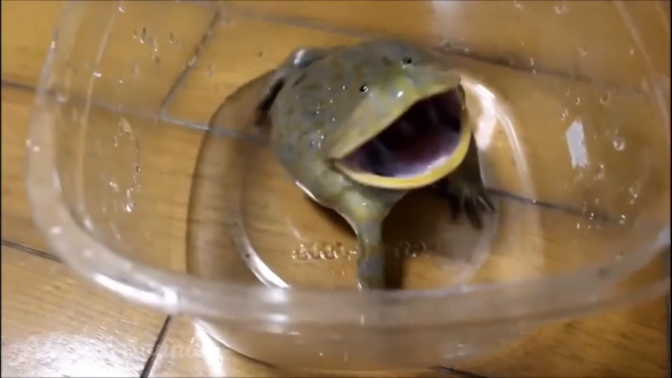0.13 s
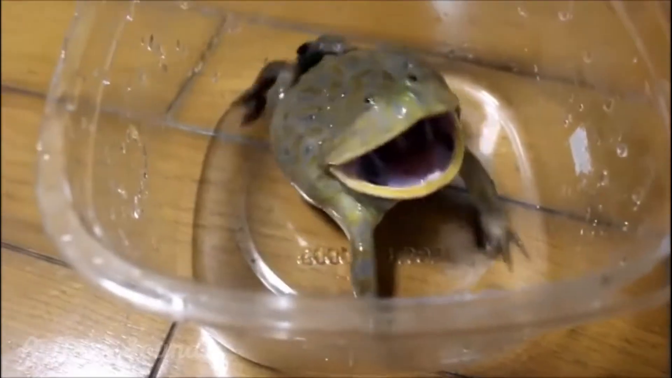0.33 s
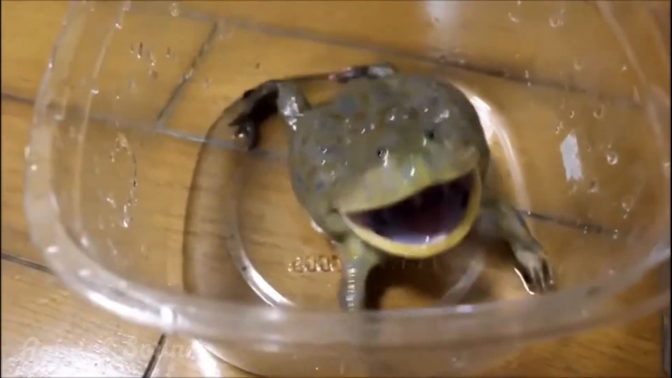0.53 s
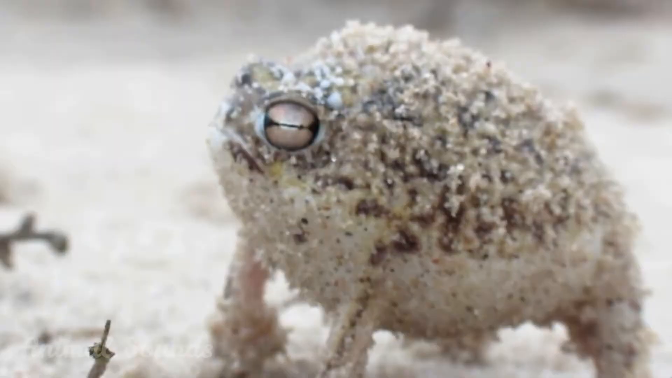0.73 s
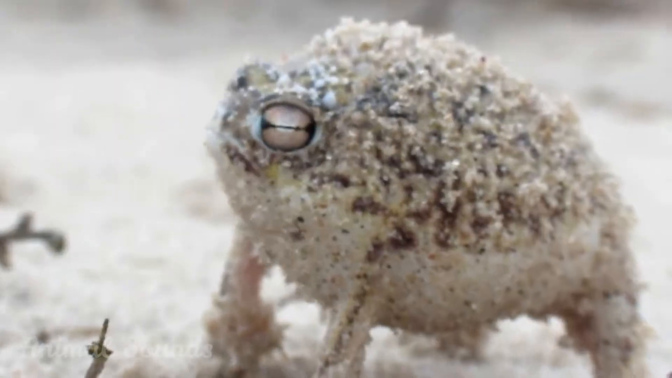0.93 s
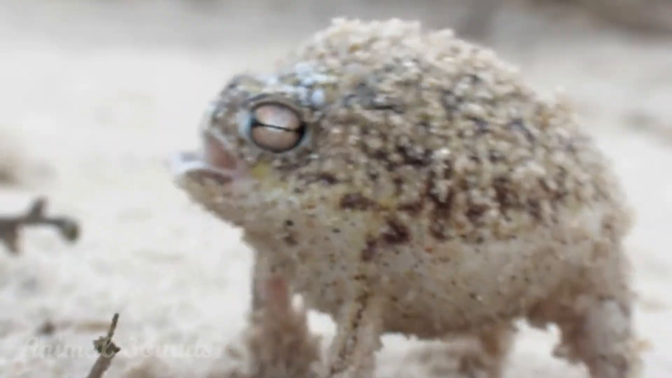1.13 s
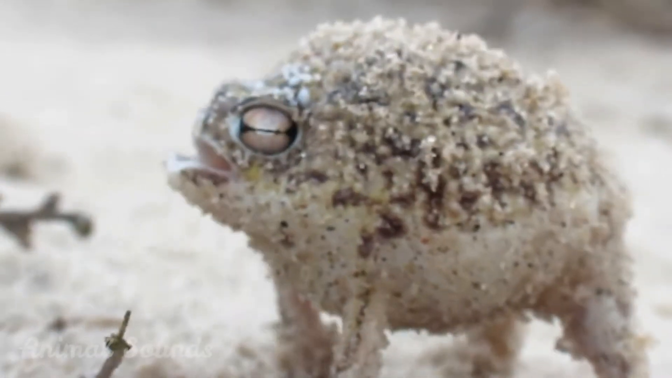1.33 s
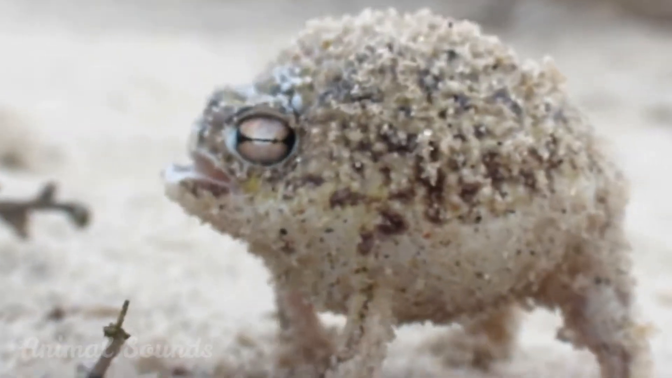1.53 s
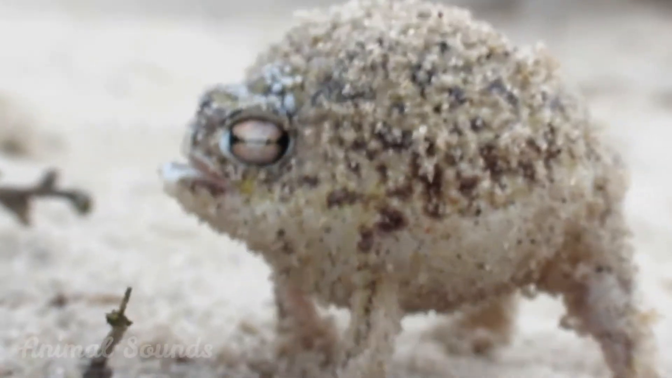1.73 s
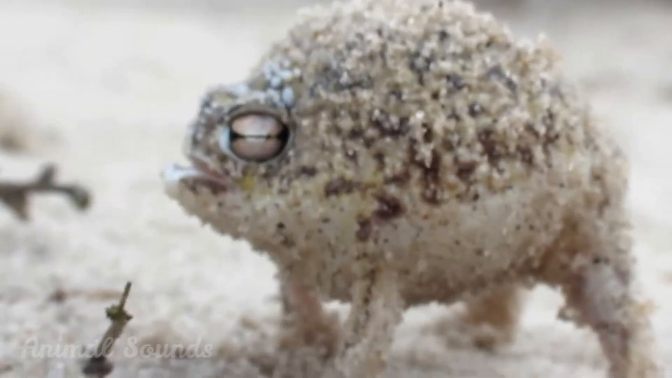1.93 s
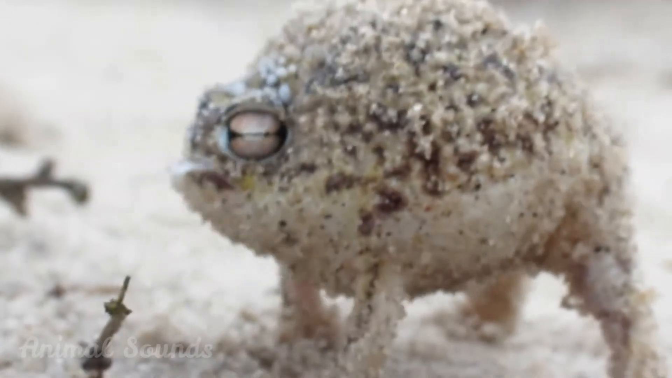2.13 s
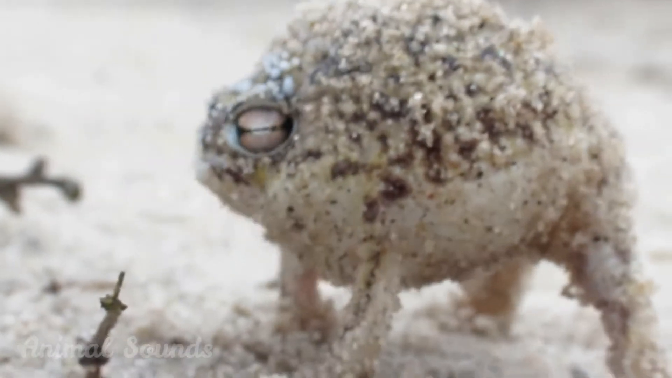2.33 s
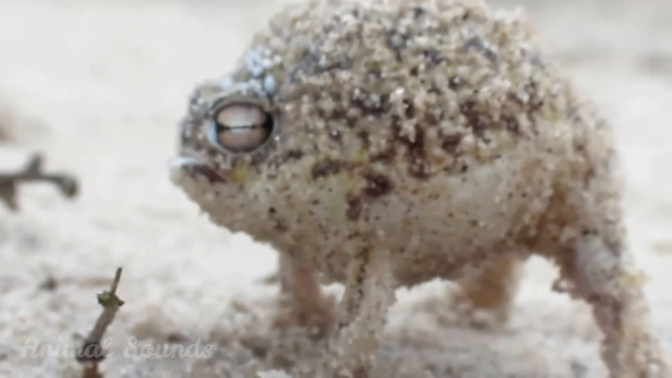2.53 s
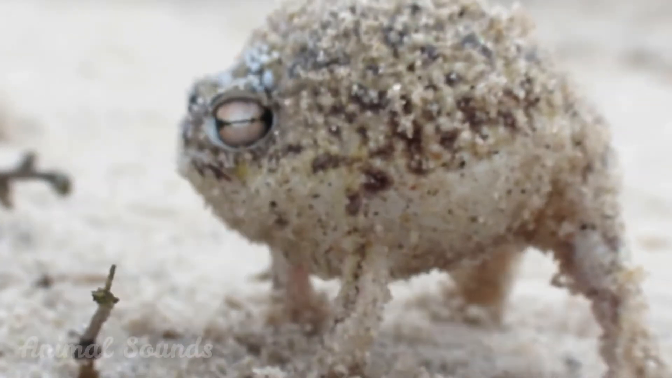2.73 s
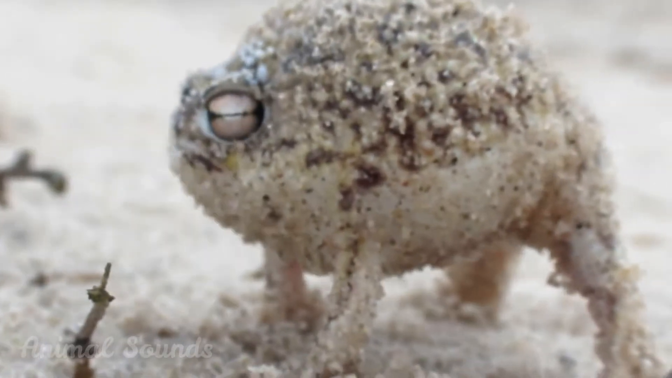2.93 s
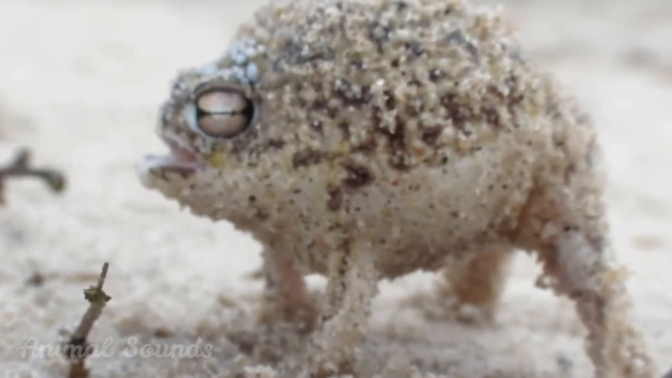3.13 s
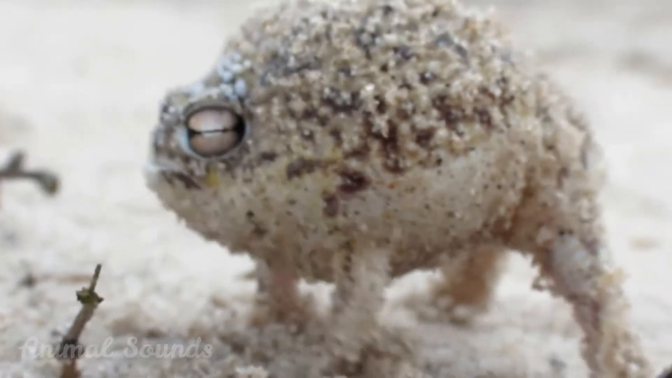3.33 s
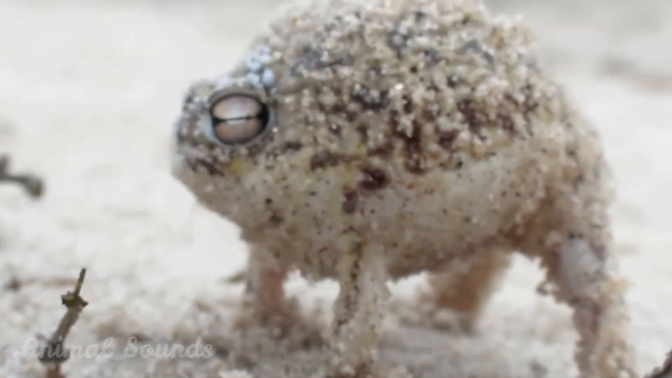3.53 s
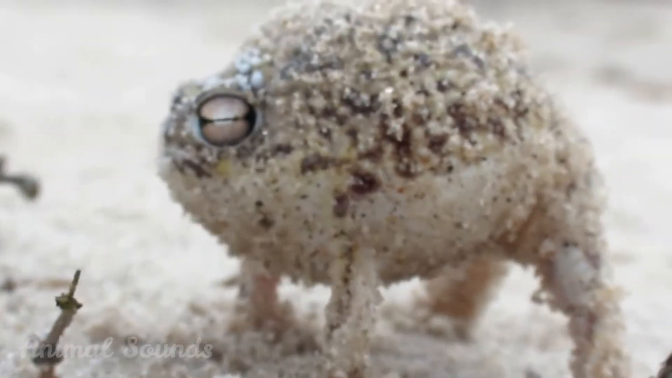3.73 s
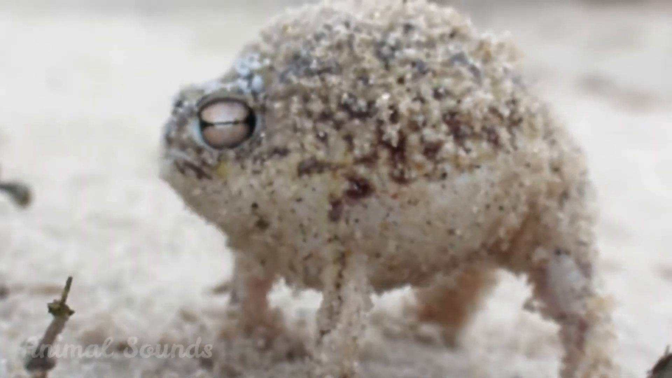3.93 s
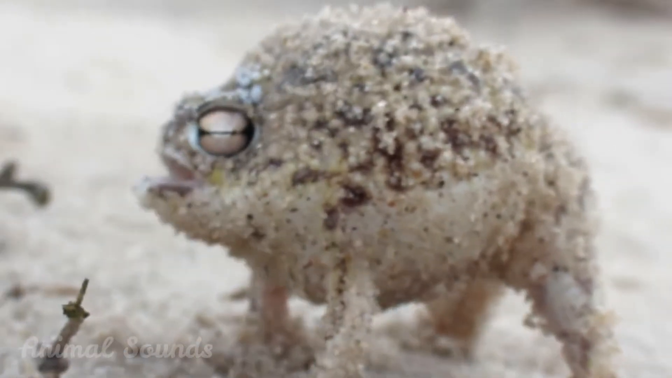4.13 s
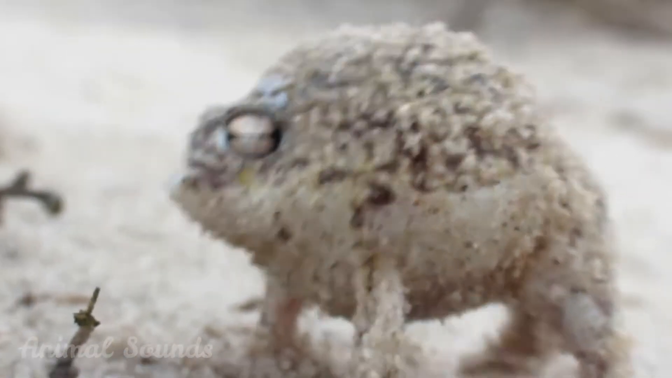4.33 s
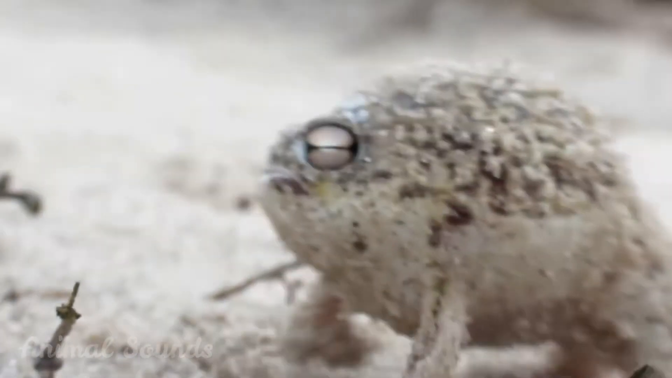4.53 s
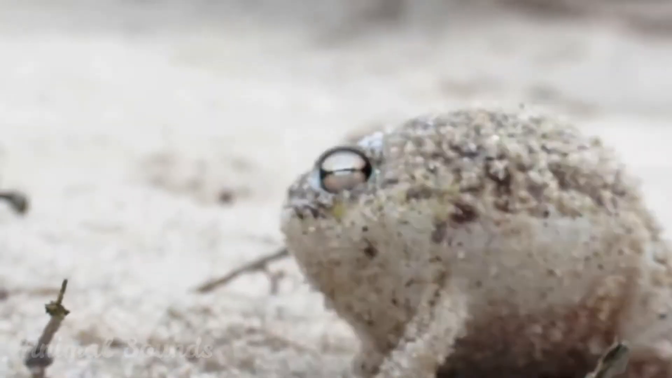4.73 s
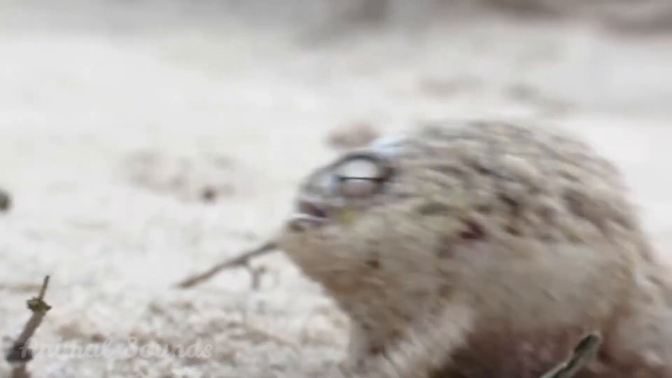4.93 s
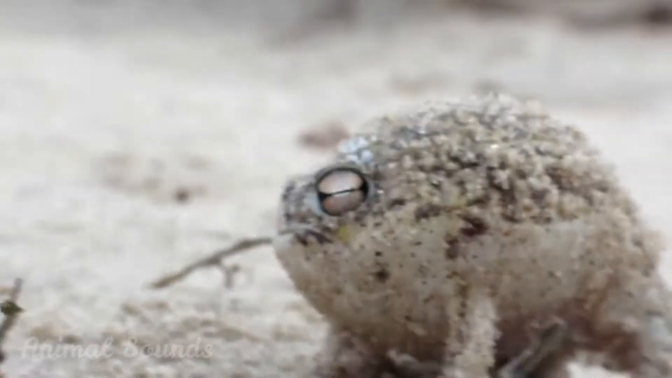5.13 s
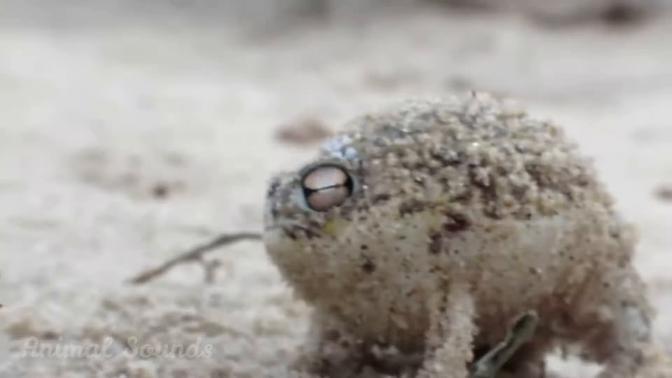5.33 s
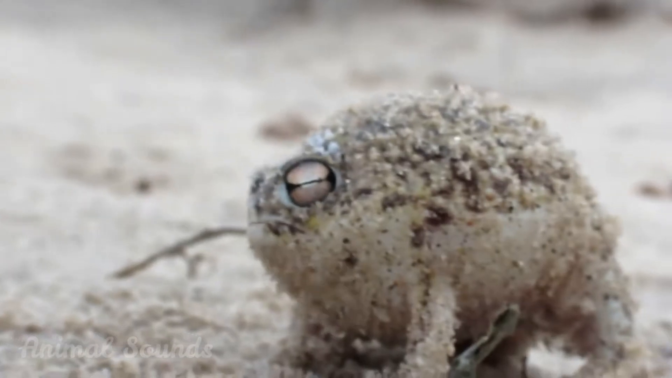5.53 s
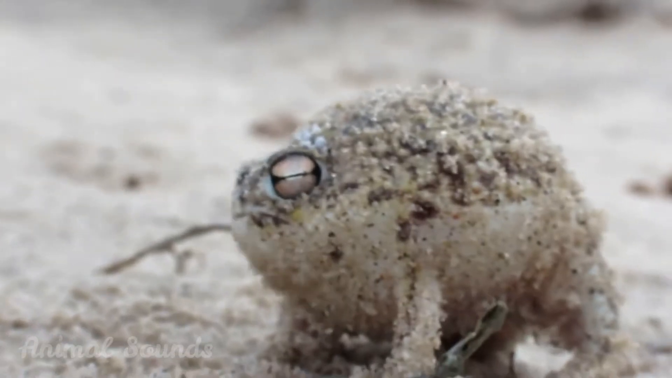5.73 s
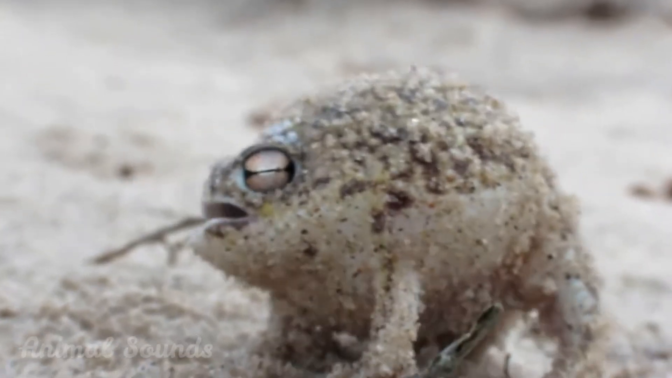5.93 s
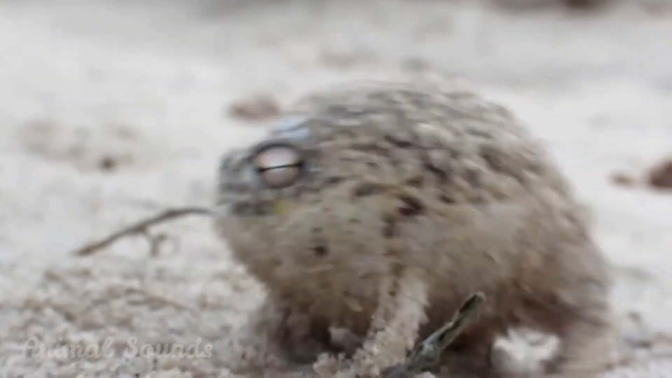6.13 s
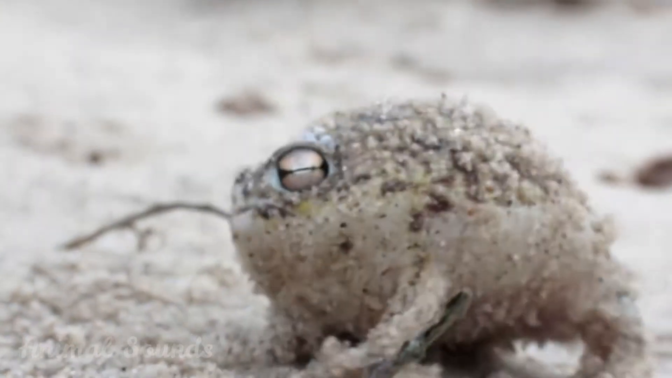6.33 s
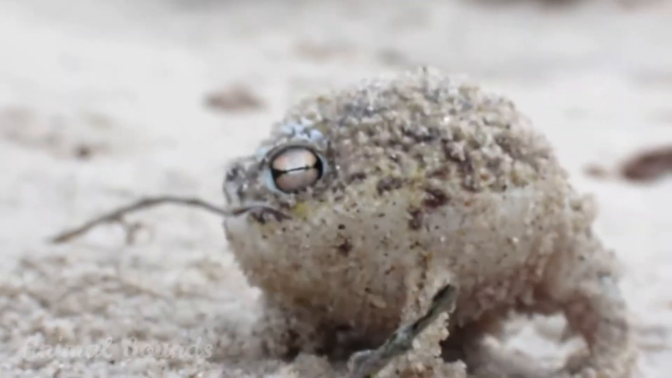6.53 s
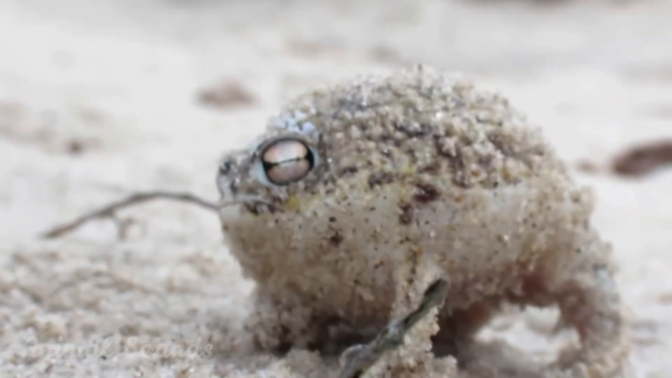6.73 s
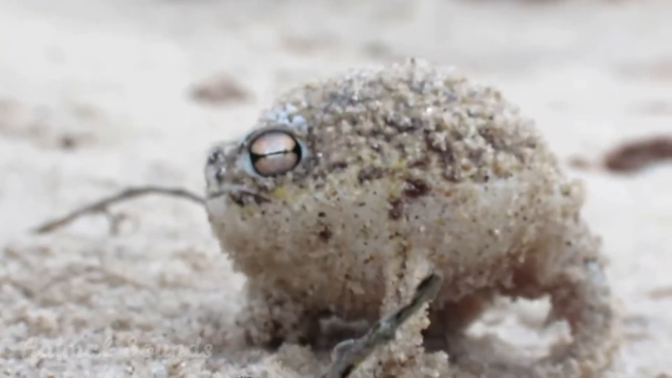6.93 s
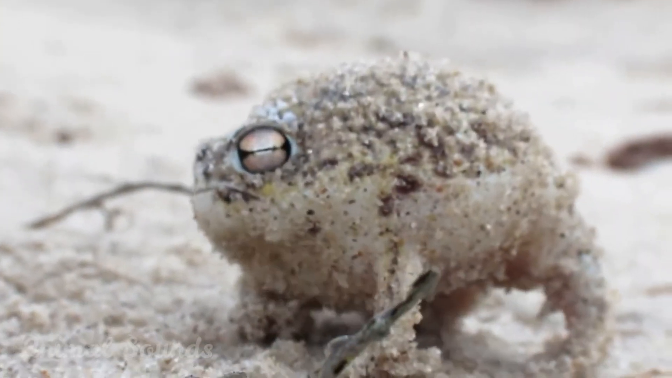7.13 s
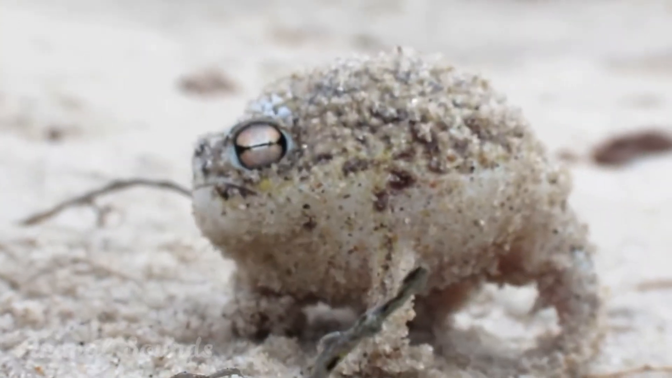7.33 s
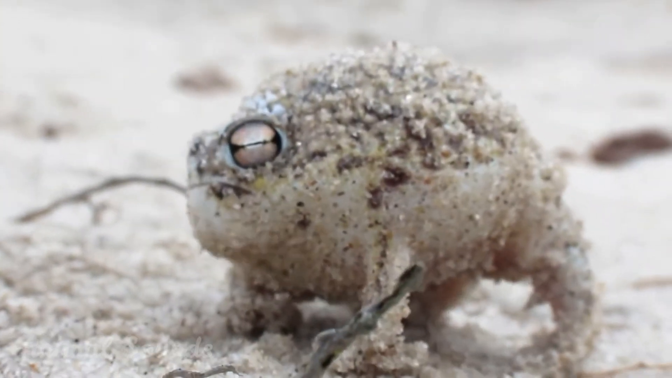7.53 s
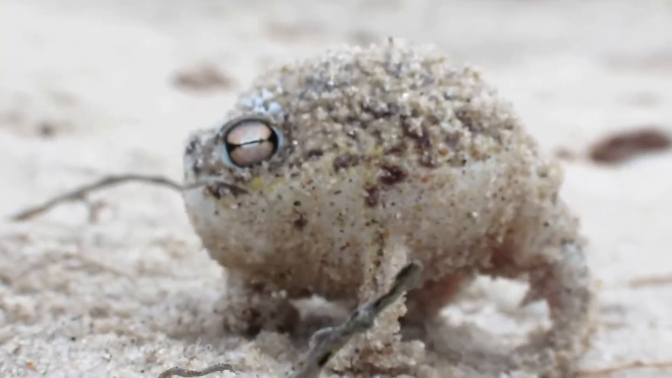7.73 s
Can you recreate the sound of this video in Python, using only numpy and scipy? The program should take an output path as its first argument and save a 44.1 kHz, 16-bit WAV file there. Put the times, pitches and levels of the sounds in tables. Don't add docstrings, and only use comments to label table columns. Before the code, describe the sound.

For the first 0.1 second there is low, boomy room rumble with faint plastic tub ringing, cut off abruptly into silence. At 0.75 a quiet outdoor background starts suddenly: distant surf-like air, a low hum, a settling rustle and tiny wind gusts. A small frog, close and dry, squeals from 1.2 to 2.3, piercing and squeaky around 1 kHz with bright sizzling overtones, chewing in tone and dropping at the end. Short squeals follow at 2.5 and 3.1. Blunt wind thumps hit near 3.9. A longer falling squeal runs 4.1 to 4.7, a steeply sinking one at 4.9, then faint sand ticks and a shuffle around 5.3. Another squeal at 5.9 fades, and a feeble, dull peep comes at 6.5. Most cries snap in sharply and end pinched, throaty and creaky; background dips beneath them. Only soft airy wash remains to about 8 seconds.

```python
import sys
import numpy as np
from scipy import signal
from scipy.fft import rfft, irfft
from scipy.io import wavfile
from scipy.ndimage import uniform_filter1d, minimum_filter1d

SR = 44100
rng = np.random.default_rng(int(sys.argv[2]) if len(sys.argv) > 2 else 0)


def invert_db(level):
    return 10 ** (np.asarray(level, dtype=float) / 20)


def digitize_waveform(pressure):
    field = np.atleast_2d(pressure).T
    bounded = np.clip(field, -1, 1)
    quanta = np.round(bounded * 32767).astype(np.int16)
    wavfile.write(sys.argv[1], SR, quanta)


N = 343980

# start in seconds, end in seconds, throat level in dB,
# fading of the ring once the mouth shuts in dB per second, sizzle in dB.
SQUEALS = [
    (1.171, 2.287, -34, 900, -29),
    (2.495, 2.766, -34, 338, -27.5),
    (3.068, 3.455, -34.5, 400, -28),
    (4.092, 4.712, -33, 340, -30.5),
    (4.924, 5.241, -31.5, 946.5, -32),
    (5.887, 6.229, -32, 809, -35.5),
    (6.538, 6.645, -36.5, 570, -41.5),
]
# time in seconds, pitch in Hz.
FOLD_PITCH = [
    [(1.193, 1386), (1.275, 1620), (1.53, 1272), (1.586, 1203), (1.704, 1172), (1.792, 1024), (1.842, 1056),
     (2.095, 1067), (2.289, 532.5)],
    [(2.512, 1192), (2.59, 1286), (2.628, 1098), (2.668, 1034), (2.722, 895), (2.752, 904), (2.764, 1020)],
    [(3.083, 889), (3.129, 1015), (3.183, 1135), (3.24, 1120), (3.303, 1103), (3.385, 944), (3.42, 830),
     (3.444, 825), (3.468, 776)],
    [(4.112, 1042), (4.155, 1190), (4.21, 1244), (4.386, 1001), (4.418, 936), (4.504, 892), (4.56, 812),
     (4.606, 824), (4.68, 645)],
    [(4.945, 903), (5.023, 1038), (5.068, 1020), (5.111, 908), (5.155, 676), (5.178, 616), (5.19, 645),
     (5.244, 525)],
    [(5.909, 1034), (5.976, 1190), (6.049, 1101), (6.083, 1010), (6.125, 833), (6.156, 676), (6.182, 794),
     (6.234, 728)],
    [(6.537, 757), (6.583, 789), (6.645, 800)],
]
# time in seconds, ring in dB, resonance in Hz.
OPEN_MOUTH = [
    [(1.184, -11.5, 6050), (1.218, -8, 8440), (1.3, -19.5, 7300), (1.404, -9.5, 7480), (1.452, -19, 7930),
     (1.594, -11.5, 7240), (1.8, -18.5, 6880), (2.05, -10.5, 6570), (2.225, -23, 5300)],
    [(2.501, -17.5, 6300), (2.533, -13.5, 8160), (2.581, -9.5, 7250)],
    [(3.092, -14.5, 5630), (3.14, -15, 7200), (3.168, -13, 7270), (3.31, -15, 6580), (3.37, -19, 5270),
     (3.382, -42.5, 5100)],
    [(4.117, -9, 7320), (4.143, -18, 7340), (4.163, -7, 7130), (4.239, -9.5, 7470), (4.317, -19, 7100),
     (4.36, -14, 7200), (4.42, -20, 5940), (4.49, -13, 6360), (4.572, -23.5, 5250)],
    [(4.946, -20.5, 5320), (4.974, -15, 7450), (5.028, -8.5, 7120), (5.1, -20, 5920), (5.12, -15.5, 6090),
     (5.17, -23, 4920)],
    [(5.892, -20, 5460), (5.914, -16, 6670), (5.97, -8, 7000), (6.052, -16.5, 7260), (6.078, -14, 6760),
     (6.15, -19.5, 5430)],
    [(6.572, -32, 4860)],
]
# fullest at in seconds, swell in dB, upper resonance lift in dB.
CLOSINGS = [
    (2.238, 3, 9),
    (2.68, 13.5, 20.5),
    (3.384, 2, -10),
    (4.597, 10, 15.5),
    (5.202, 3, 19.5),
    (6.201, 1.5, 18.5),
    (6.613, 5.5, 15),
]
# start in seconds, cycle scatter 0-1, strong-weak alternation 0-1.
CREAKS = [
    (2.235, .1, .04),
    (2.735, .45, .2),
    (3.435, .22, .12),
    (4.662, .6, .35),
    (5.177, .55, .5),
    (6.166, .47, .55),
    (6.606, .35, .35),
]
# frequency in Hz, level in dB.
THROAT = [(600, -18), (1100, -4), (2000, 5), (3200, 1), (4000, -1.5), (5000, -28.5), (8000, -18),
          (16000, -40.5)]
# frequency in Hz, level in dB.
SIZZLE = [(7000, -22.5), (9500, -10.5), (11500, -9), (13500, 1), (15500, 2), (17000, -8)]
# delay in seconds, left share, right share.
ECHOES = [
    (.000272, 0.21, -0.34),
    (0.00023, 0.18, 0.017),
    (0.00069, -0.25, 0.09),
    (.00018, 0.16, 0.2),
    (0.011, .03, 0.18),
]
# time in seconds, level in dB, frequency in Hz.
PUFFS = [
    (3.897, -19, 45),
    (3.9245, -8, 170),
    (3.9325, -11, 130),
    (3.9455, -8, 110),
    (3.965, -22, 45),
]
# time in seconds, level in dB, length in seconds.
GUSTS = [(.84, -41, 0.088), (1.1, -48.5, 0.22), (1.79, -43, 0.11), (1.94, -39, 0.053), (2.12, -46, 0.062),
         (2.52, -40, 0.043), (2.65, -37, 0.052), (3.08, -43, 0.053), (3.5, -45.5, .2), (3.94, -27.5, 0.068),
         (4.11, -34, 0.048), (4.36, -35.5, 0.17), (4.62, -30.5, 0.14), (5.04, -34, 0.039), (5.48, -44, .1),
         (6.16, -46, .05), (6.5, -48.5, 0.051)]
# time in seconds, peak in dB, frequency in Hz.
GRAINS = [
    (0.8594, -35, 8040),
    (5.247, -64, 4680),
    (5.2624, -53, 5100),
    (5.2794, -67, 6200),
    (5.3134, -47, 5650),
    (5.3657, -51, 4720),
]
# frequency in Hz, level in dB per Hz.
RUSTLE = [(410, -35.5), (700, -6), (1150, -8.5), (1330, 0), (2400, -10), (5400, -10.5), (13700, -26),
          (16000, -32.5)]
# frequency in Hz, level in dB per Hz.
AIR = [(12, -52.5), (20, -14.5), (43, -9.5), (68, -1), (107, -8), (198, -3.5), (434, -10.5), (1060, -20.5),
       (1150, -24.5), (1480, -22), (1860, -28.5), (3630, -36), (16000, -46.5)]
# frequency in Hz, left-right likeness from -1 to 1.
AIR_LIKENESS = [(60, 0.22), (180, 0.78), (550, 0.26), (1650, 0.013), (4970, 0.08), (15000, 0.01)]
# frequency in Hz, level in dB per Hz.
TUB_RUMBLE = [(20, -26), (95, 7), (170, -11), (230, -5.5), (500, -17), (930, -12.5), (1300, -16),
              (2200, -23.5), (3100, -17), (3500, -29.5), (6000, -39.5), (12000, -54), (16000, -90)]
# time in seconds, level in dB, frequency in Hz.
TUB_RINGS = [
    (.005, -32.5, 1260),
    (.032, -39, 2930),
    (.052, -31.5, 923),
    (.072, -36, 678),
    (.09, -36.5, 670),
]

TUB_END_S, SAND_START_S = .106, .749
ONSET_HZ, ONSET_SHARE, ONSET_DROP_S = 1018, .4, .013
STEADY_SCATTER, ONSET_SCATTER, ONSET_ROUGH_S, CREAK_RISE_S = .007, .25, .035, .016
FEEBLE_DB, FEEBLE_SCATTER = -28, .15
HELD_S, TREMOR_PER_S, TREMOR_HZ = 1.842, 8.2, 7
OPENING_HZ, RING_RISE_DB_PER_S, MOUTH_WIDTH_HZ = 5300, 800, 814
SHUT_HZ, SHUT_S, BREATH_DB = 5070, 0.052, -33
VALLEY_HZ, VALLEY_WIDTH_HZ, VALLEY_DEPTH = 4430, 450, 0.72
ATTACK_S, ATTACK_DB, POP_DB, POP_S = 0.013, -12, 10, 0.028
UPPER_HZ, OPEN_LIFT_DB, SPENT_DB, SPENT_LIFT_DB = 3200, 4.5, -48.5, 0
SIZZLE_DB_PER_KHZ, SIZZLE_FOLLOWS, SPENT_SIZZLE_DB = 5, 0.26, -70
FLUTTER_DB, HISS_DB = 4.5, -17
LEFT_LEAD_S, SCATTER_DB, SCATTER_T60_S = 5e-6, -25, 0.094
RUSTLE_DB, RUSTLE_FADE_DB_PER_S, RUSTLE_REST_DB = -48, 18, -68.5
SHUFFLE_S, SHUFFLE_DB, SHUFFLE_LENGTH_S = 5.3, -64, .3
HUM_DB, HUM_DROP_DB, HUM_RISE_S, HUM_END_S = -53, -9.5, 0.11, 3.01
DUCK_DB, TREBLE_DUCK_DB, RELEASE_S = -3, -22, 0.01


def frog():
    voice = sum(squeal(*rows) for rows in zip(SQUEALS, CLOSINGS, CREAKS, FOLD_PITCH, OPEN_MOUTH))
    hz = np.fft.rfftfreq(N, 1 / SR)
    bright = (hz / 2000) ** 3 / (1 + (hz / 2000) ** 3)
    paths = np.exp(2j * np.pi * np.outer([1, -1], hz) * LEFT_LEAD_S)
    for lag, *share in ECHOES:
        paths = paths + np.outer(share, bright * np.exp(-2j * np.pi * hz * lag))
    age = np.arange(2600) / SR
    blur = rng.standard_normal((2, 2600)) * invert_db(-60 * age / SCATTER_T60_S) * (age > .0015)
    blur = invert_db(SCATTER_DB) * rfft(blur / np.sqrt(np.sum(blur ** 2) / 2), N) * bright
    return irfft(rfft(voice) * (paths + blur), N), voice


def squeal(call, closing, creak, folds, mouth):
    start, end, throat_level_db, fade, bright_db = call
    t = np.arange(round(start * SR), round(end * SR)) / SR
    ring_db, mouth_hz, sizzle_db = mouth_motion(t, start, end, mouth, fade, bright_db)
    throat_db, lift_db = throat_motion(t, start, end, mouth[-1][0], throat_level_db, closing)
    pitch, scatter, alternation = fold_motion(t, start, creak, folds, ring_db.max() < FEEBLE_DB)
    waves, hz, strength = fold_pulses(pitch, scatter, alternation)
    body = throat_body(t, waves, hz, throat_db, lift_db)
    breath = invert_db(BREATH_DB) * hiss(t)
    sharp = sizzle(t, waves, hz, sizzle_db) + mouth_ring(t, waves, hz, ring_db, mouth_hz) * (1 + breath)
    edge = np.clip(np.minimum((t - t[0]) / 0.0013, (t[-1] - t) / 0.0049), 0, 1)
    high_pass = signal.butter(4, 3600, "high", fs=SR, output="sos")
    out = np.zeros(N)
    first = round(t[0] * SR)
    out[first:first + len(t)] = edge * strength * body + signal.sosfilt(high_pass, edge * strength * sharp)
    return out


def fold_motion(t, start, creak, folds, feeble):
    settled_s, settled_hz = folds[0]
    creak_s, creak_scatter, creak_alternation = creak
    high = ONSET_HZ + ONSET_SHARE * settled_hz
    lets_go = max(settled_s - ONSET_DROP_S, start + 0.0022)
    snap = [(start, high), (lets_go, .96 * high)] if settled_s > start + .005 else []
    wavering = (t > HELD_S) * (t < HELD_S + 2 / TREMOR_PER_S)
    tremor = TREMOR_HZ * (np.cos(2 * np.pi * TREMOR_PER_S * (t - HELD_S)) - 1) * wavering
    creaky = np.clip((t - creak_s) / CREAK_RISE_S, 0, 1)
    rough_start = ONSET_SCATTER * np.clip(1 - (t - start) / ONSET_ROUGH_S, 0, 1) * (1 - creaky)
    scatter = (FEEBLE_SCATTER if feeble else STEADY_SCATTER) + rough_start + creak_scatter * creaky
    return glide(snap + folds, t) + tremor, scatter, creak_alternation * creaky


def fold_pulses(pitch, scatter, alternation):
    length_luck, force_luck = rng.standard_normal((2, 2000))
    cycle = (np.cumsum(pitch) / SR).astype(int)
    turns = np.cumsum(pitch * (1 + .2 * scatter * length_luck[cycle])) / SR
    order = np.arange(1, 31)[:, None]
    hz = order * pitch
    waves = np.sqrt(2) * (hz < 15850) * np.exp(2j * np.pi * order * (turns - .1))
    n = len(pitch)
    knots = rng.standard_normal((len(order), n // 600 + 2))
    shiver = np.array([np.interp(np.arange(n) / 600, np.arange(len(row)), row) for row in knots])
    waves = waves * invert_db(FLUTTER_DB * shiver * np.clip(hz / 12000, 0, 1) ** 2)
    cycle = turns.astype(int)
    strength = 1 + 0.8 * scatter * force_luck[cycle] + alternation * (-1.) ** cycle
    return waves, hz, uniform_filter1d(uniform_filter1d(strength, size=16), size=16)


def mouth_motion(t, start, end, mouth, fade, bright_db):
    first_s, first_db, _ = mouth[0]
    lips_part = (start, first_db - RING_RISE_DB_PER_S * (first_s - start), OPENING_HZ)
    ring_db, mouth_hz = in_time([lips_part] + mouth, t)
    sizzle_db = bright_db + SIZZLE_DB_PER_KHZ * (mouth_hz - 7000) / 1000 + SIZZLE_FOLLOWS * (ring_db + 13)
    shut = mouth[-1][0]
    since = np.maximum(t - shut, 0)
    ring_db = ring_db - fade * since
    mouth_hz = SHUT_HZ + (mouth_hz - SHUT_HZ) * np.exp(-since / SHUT_S)
    sizzle_db = sizzle_db + (SPENT_SIZZLE_DB - sizzle_db) * (since / (end - shut)) ** 1.1
    return ring_db, mouth_hz, sizzle_db


def mouth_ring(t, waves, hz, ring_db, mouth_hz):
    depth = VALLEY_DEPTH * np.clip((t[-1] - t) / 0.1, 0, 1)
    valley = 1 - depth / (1 + (2 * (hz - VALLEY_HZ) / VALLEY_WIDTH_HZ) ** 2)
    peak = 1 / (1 + 2j * (hz - mouth_hz) / MOUTH_WIDTH_HZ) ** 1.347
    resonance = valley * (hz / mouth_hz) ** 0.13 * peak
    power = uniform_filter1d(np.sum(np.abs(resonance) ** 2, axis=0), size=2000)
    return np.real(resonance * waves).sum(axis=0) * invert_db(ring_db) / np.sqrt(power)


def throat_motion(t, start, end, shut, level_db, closing):
    full, swell_db, full_lift_db = closing
    full = np.clip(full, shut + .002, end - .002)
    path = [(shut, level_db, OPEN_LIFT_DB), (full, level_db + swell_db, full_lift_db), (end, SPENT_DB, SPENT_LIFT_DB)]
    throat_db, lift_db = in_time(path, t)
    pop = POP_DB * np.exp(-(t - start) / POP_S)
    attack = ATTACK_DB * np.clip(1 - (t - start) / ATTACK_S, 0, 1)
    return throat_db + pop + attack, lift_db


def throat_body(t, waves, hz, throat_db, lift_db):
    shutting = np.clip(1 - (t[-1] - t) / 0.053, 0, 1)
    upper = lift_db / (1 + ((hz * (1 + 0.77 * shutting ** 2) - UPPER_HZ) / 600) ** 2)
    throat = invert_db(at_hz(THROAT, hz * (1 + 0.27 * shutting)) + upper)
    return np.real(throat * waves).sum(axis=0) * invert_db(throat_db) / np.sqrt(np.sum(throat ** 2, axis=0))


def sizzle(t, waves, hz, sizzle_db):
    colour = invert_db(at_hz(SIZZLE, hz))
    top = np.real(colour * waves).sum(axis=0) * invert_db(sizzle_db) / np.sqrt(np.sum(colour ** 2, axis=0))
    return top * (1 + invert_db(HISS_DB) * hiss(t))


def hiss(t):
    return rms_one(uniform_filter1d(rng.standard_normal(len(t)), size=24))


def wind(t):
    gust_db = np.minimum(swells(GUSTS, -59, t), -31)
    colour = [(10, -5.0), (25, 0.5), (70, 0.0), (150, -8.5), (400, -31.0), (2000, -65)]
    return invert_db(gust_db + 3.1 * drift(15)) * coloured(colour, [(20, -0.84), (400, 0.0051)])


def puffs():
    thumps = sum(ring(s - .25 / hz, db, hz, cycles=2.6) for s, db, hz in PUFFS) * [[1.2], [-.8]]
    return signal.sosfilt(signal.butter(2, 380, fs=SR, output="sos"), thumps)


def sand_grains():
    return sum(ring(s, db, hz, cycles=22.0) for s, db, hz in GRAINS)


def rustle(t):
    settling_db = RUSTLE_DB - RUSTLE_FADE_DB_PER_S * (t - SAND_START_S)
    shuffle_db = swells([(SHUFFLE_S, SHUFFLE_DB, SHUFFLE_LENGTH_S)], RUSTLE_REST_DB, t)
    return invert_db(np.maximum(settling_db, shuffle_db)) * coloured(RUSTLE, [(100, 1.0), (9000, 1.0)])


def hum(t):
    before = np.clip(1 - (t - SAND_START_S) / HUM_RISE_S, 0, 1)
    after = np.clip((t - HUM_END_S) / 0.23 + .5, 0, 1)
    colour = [(80, -44.5), (95, -0.5), (99, -6.0), (103, 1.5), (120, -48.5)]
    return invert_db(HUM_DB + HUM_DROP_DB * (before + after) + 2.0) * coloured(colour, [(50, .9), (200, 0.3)])


def far_air():
    return invert_db(-47.5 + 1.0 * drift(6.3)) * coloured(AIR, AIR_LIKENESS)


def tub_room(t):
    rumble = invert_db(-37.5) * coloured(TUB_RUMBLE, [(50, 0.94), (250, 0.85), (800, 0.95)])
    rings = sum(ring(s, db, hz, cycles=57.0) for s, db, hz in TUB_RINGS)
    return (rumble + rings) * (t < TUB_END_S)


def ring(s, level_db, hz, cycles):
    click = np.full(N, 1e-18)
    click[round(s * SR)] = invert_db(level_db)
    r, w = invert_db(-60 * hz / (cycles * SR)), 2 * np.pi * hz / SR
    return signal.lfilter([0, np.sin(w)], [1, -2 * r * np.cos(w), r * r], click)


def coloured(spectrum, likeness):
    hz = np.maximum(np.fft.rfftfreq(N, 1 / SR), 5)
    mid, side = rfft(rng.standard_normal((2, N))) * invert_db(at_hz(spectrum, hz))
    alike = np.clip(at_hz(likeness, hz), -1, 1)
    return rms_one(irfft(np.sqrt(1 + alike) * mid + np.sqrt(1 - alike) * side * [[1], [-1]], N))


def drift(rate):
    r = np.exp(-2 * np.pi * rate / SR)
    return rms_one(signal.lfilter([1], [1, -2 * r, r * r], rng.standard_normal(N + SR))[SR:])


def swells(rows, rest_db, t):
    power = sum(invert_db(2 * db) * np.exp(-((t - s) / (0.55 * length)) ** 2) for s, db, length in rows)
    return 10 * np.log10(invert_db(2 * rest_db) + power)


def glide(rows, t):
    s, value = np.transpose(rows)
    step = np.diff(value) / np.diff(s)
    before, after = np.r_[step[0], step], np.r_[step, step[-1]]
    slope = np.where(before * after > 0, 2 * before * after / (before + after + 1e-9), 0)
    k = np.clip(np.searchsorted(s, t) - 1, 0, len(s) - 2)
    span = s[k + 1] - s[k]
    u = np.clip((t - s[k]) / span, 0, 1)
    bend = (1 - u) * (slope[k] - step[k]) - u * (slope[k + 1] - step[k])
    return value[k] + span * u * (step[k] + (1 - u) * bend)


def in_time(rows, t):
    s, *columns = np.transpose(rows)
    return [np.interp(t, s, c) for c in columns]


def at_hz(points, hz):
    point_hz, value = np.transpose(points)
    return np.interp(np.log(hz), np.log(np.maximum(point_hz, 1)), value)


def rms_one(x):
    return x / np.sqrt(np.mean(x ** 2) + 1e-20)


def scene():
    t = np.arange(N) / SR
    heard, voice = frog()
    loud = np.clip(uniform_filter1d(np.abs(voice), size=2000) / 0.09, 0, 1)
    r = np.exp(-1 / (RELEASE_S * SR))
    held = signal.lfilter([1 - r], [1, -r], loud)
    around = wind(t) + puffs() + sand_grains() + rustle(t) + hum(t) + far_air()
    bass = signal.sosfiltfilt(signal.butter(2, 1800, fs=SR, output="sos"), around)
    around = invert_db(DUCK_DB * held) * bass + invert_db(TREBLE_DUCK_DB * held) * (around - bass)
    return tub_room(t) + (heard + around) * (t > SAND_START_S)


def band_limit(x):
    return signal.sosfilt(signal.butter(12, 16810, fs=SR, output="sos"), x)


def record(dry):
    room_left = minimum_filter1d(np.minimum(1, .8 / (np.abs(dry).max(axis=0) + 1e-9)), size=441)
    held = dry * uniform_filter1d(room_left, size=221)
    top_cut = signal.cheby2(12, 50, 16400, fs=SR, output="sos")
    return band_limit(signal.sosfilt(top_cut, held))


dry = scene()
out = record(dry)
digitize_waveform(out)
```